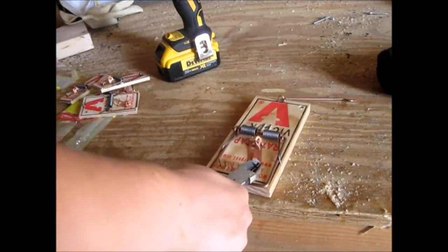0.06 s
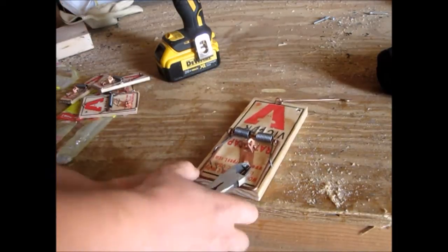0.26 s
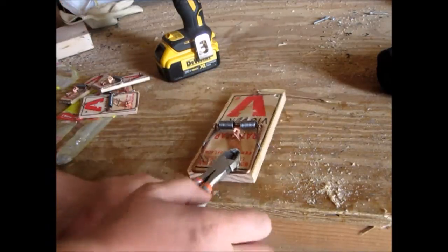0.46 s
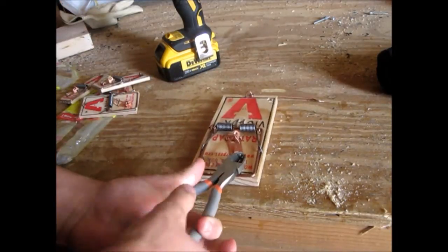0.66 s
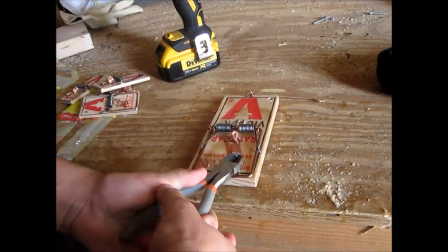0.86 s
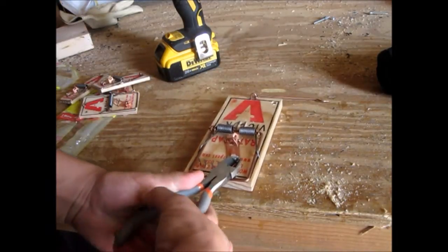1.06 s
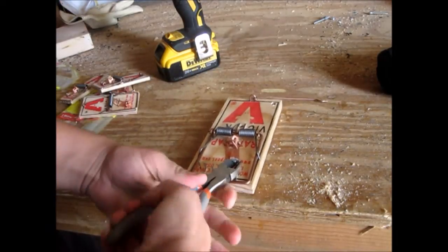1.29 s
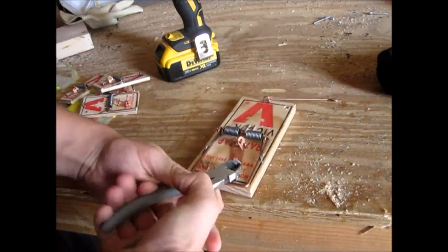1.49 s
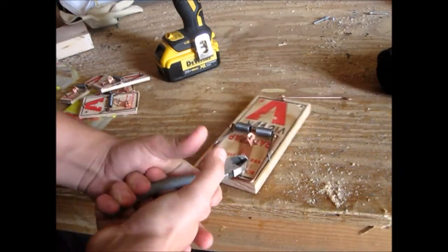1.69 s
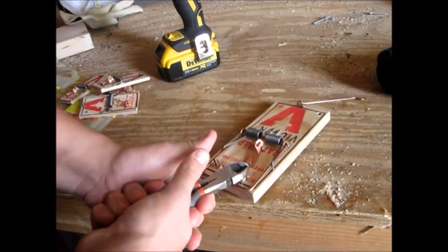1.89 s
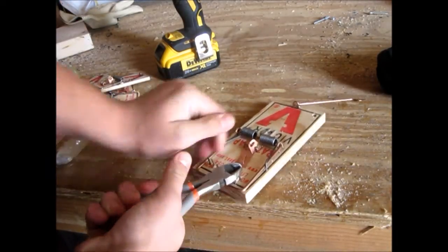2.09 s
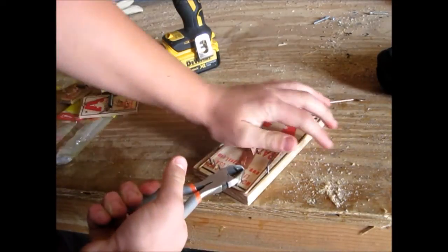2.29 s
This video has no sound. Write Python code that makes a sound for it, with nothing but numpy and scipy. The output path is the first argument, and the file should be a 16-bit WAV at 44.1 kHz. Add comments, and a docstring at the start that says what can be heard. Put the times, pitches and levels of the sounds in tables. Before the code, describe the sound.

A wooden rat trap knocks and scrapes on a workbench in uneven clusters. Hands rub on plier grips midway, then steel jaws click and the spring shivers among more knocks. A small workshop, with light microphone hiss.

```python
"""A wooden rat trap knocks and drags on a workbench while pliers work at its wire.
Each knock makes the board clack and rock and the bench top ring; dragging makes it judder and grind.
The spring shivers, the steel jaws tick and squeak on the wire, and hands rub on the grips.
The small workshop rings briefly; a small camera adds hiss and a thin whine."""
import sys
import numpy as np
from scipy import signal
from scipy.fft import rfft, irfft
from scipy.io import wavfile

SR = 44100
rng = np.random.default_rng(int(sys.argv[2]) if len(sys.argv) > 2 else 0)


def master_out(mix):
    """Clip the mix to full scale and print it as 16-bit PCM to the path in sys.argv[1]."""
    frames = np.transpose(np.atleast_2d(mix))
    ceiling = np.clip(frames, -1, 1)
    pcm = np.round(ceiling * 32767).astype(np.int16)
    wavfile.write(sys.argv[1], SR, pcm)


N = 108045
T = np.arange(N) / SR
RING = T[:SR // 3]  # time in seconds for one short sound

# The tones the bench top rings with. Each row: pitch in Hz, level in dB, seconds to fade by 60 dB.
BENCH_TONES = [(164, -41, .13), (198, 2.5, 0.066), (283, -34.5, 0.02), (280.4, 9, 0.077), (339, 2, 0.054),
               (398.6, -14, 0.12), (442, -3.5, 0.14)]


def undb(db):
    """Turn decibels into a factor to multiply by."""
    return 10 ** (np.asarray(db) / 20)


def unit(x):
    """Scale a sound so that its average level (rms) is 1."""
    return x / np.sqrt(np.mean(x ** 2) + 1e-20)


def blow(x, blow_s=0.0096):
    """Give a short sound the same energy as a level of 1 held for blow_s seconds."""
    return x / np.sqrt(np.sum(x ** 2) / (blow_s * SR) + 1e-20)


def fade(t60):
    """A curve that falls by 60 dB every t60 seconds."""
    return np.exp(-np.log(1000) * RING / t60)


def swell(middle, length):
    """A smooth rise and fall that stays above half height for length seconds."""
    return np.cos(np.pi / 2 * np.clip((T - middle) / length, -1, 1)) ** 2


def cut(x, hz, keep="low", order=2):
    """Keep the low or the high side of hz; a higher order cuts more steeply."""
    return signal.sosfilt(signal.butter(order, min(hz, SR / 2 - 1), keep, fs=SR, output="sos"), x)


def colour(x, points):
    """Make frequencies louder or softer along a curve of (Hz, dB) points."""
    hz, db = np.array(points).T
    size = 8192
    log_hz = np.log(np.maximum(np.arange(size // 2 + 1) * SR / size, 1))
    gain = undb(np.interp(log_hz, np.log(hz), db))
    # Fold the filter in time so that it never rings ahead of the sound.
    cepstrum = irfft(np.log(gain))
    cepstrum[1:size // 2] *= 2
    cepstrum[size // 2 + 1:] = 0
    response = irfft(np.exp(rfft(cepstrum)))[:size // 2]
    return signal.fftconvolve(x, response)[:len(x)]


def ring(tones, scatter_db=1.2):
    """The fading tones of a struck object; their balance shifts a little from blow to blow."""
    return -sum(undb(db + scatter_db * rng.standard_normal()) * fade(t60) * np.sin(2 * np.pi * hz * RING)
                for hz, db, t60 in tones)


def burst(t60):
    """Noise that dies away."""
    return rng.standard_normal(len(RING)) * fade(t60)


def grains(per_second, spread_db=2.5):
    """Tiny contacts of uneven size at random times."""
    hits = rng.random(N) < per_second / SR
    sizes = undb(spread_db * rng.standard_normal(N))
    return hits * sizes * np.sign(rng.standard_normal(N))


def add(out, start, x):
    """Mix a sound in at start seconds."""
    i = int(start * SR)
    out[i:i + len(x)] += x[:N - i]


def trap_knocks():
    """The trap's board clacks, rocks for a few cycles and sets the bench top ringing."""
    # Each row: start in seconds, thump level in dB, rocking pitch in Hz (set by where the board is
    # held), clack level in dB, treble limit in Hz (higher for a harder contact).
    knocks = [(0.027, -34.5, 315, -45, 900), (0.2452, -23, 296, -30.5, 1650), (.268, -31, 350, -40.5, 1190),
              (0.2892, -26, 280, -47, 2000), (0.389, -25.5, 268, -43, 2800), (0.427, -28, 292, -49, 2660),
              (0.442, -27.5, 298, -62, 2800), (.506, -27.5, 300, -55, 1980), (0.5214, -17, 270, -15, 2780),
              (0.5292, -26, 417, -33, 1110), (0.5503, -22, 240, -30, 1660), (0.584, -30, 170, -38, 1500),
              (.677, -33.5, 293, -58, 1500), (.976, -29, 242, -44.5, 2500), (1.202, -25.5, 290, -40, 1500),
              (1.218, -28, 303, -62, 1500), (1.284, -32, 212, -40, 1030), (1.5098, -15, 325, -21, 2160),
              (1.523, -26.5, 363, -43, 1137), (1.671, -31.5, 292, -52, 2500),
              (1.718, -26.5, 327, -58, 2500), (1.746, -26, 345, -63, 2500),
              (1.9297, -31.5, 355, -40.5, 4030), (1.981, -32.5, 274, -59, 1510),
              (2.007, -27, 335, -43, 2220), (2.017, -27.5, 312, -55, 1500), (2.067, -22.5, 440, -33, 3500),
              (2.072, -27.5, 458, -37, 2200), (2.089, -28.5, 190, -44, 2000), (2.101, -38, 289, -57, 2500),
              (2.1479, -20, 323, -31.5, 3480), (2.3671, -28.5, 280, -38.5, 1800)]
    # The board's tones. Each row: pitch in Hz, level in dB, seconds to fade by 60 dB.
    wood_tones = [(575, -2, 0.098), (683.4, -5, 0.097), (863, 11, 0.016), (1212, 9.5, 0.0077),
                  (1444, -9.5, 0.04), (1750, 8, 0.0087), (2014, 10, .015), (2360, -3, .014),
                  (3400, -10, 0.023)]
    rock_rise_s, bench_db, splinter_db = 0.00068, -10.5, -4
    out = np.zeros(N)
    for start, thump_db, rock_hz, clack_db, treble_hz in knocks:
        rise = 1 - np.exp(-RING / rock_rise_s)
        rock = -np.sin(2 * np.pi * rock_hz * RING) * fade(t60=0.033) * rise
        bench = signal.fftconvolve(rock, ring(BENCH_TONES))[:len(RING)]
        thump = blow(blow(rock) + undb(bench_db) * blow(bench))
        wood = blow(ring(wood_tones)) + undb(splinter_db) * blow(burst(t60=0.035))
        clack = blow(cut(cut(wood, treble_hz, order=3), 464, "high"))
        add(out, start, undb(thump_db) * thump + undb(clack_db) * clack)
    return out


def trap_drags():
    """The board sticks and slips, shaking the bench, while sawdust grinds under it."""
    # Each row: middle in seconds, length in seconds, judder level in dB, grit level in dB.
    drags = [(.14, 0.11, -44, -56), (0.276, 0.055, -31, -48), (0.437, 0.11, -38.5, -43),
             (0.562, 0.081, -28.5, -41.5), (1.215, .06, -48, -48), (1.409, 0.13, -44, -45),
             (1.713, 0.16, -41, -44), (1.737, 0.03, -33, -41), (1.898, 0.095, -40.5, -46.5),
             (2.005, 0.11, -37, -45.5), (2.092, .04, -37, -42.5), (2.173, 0.055, -39, -50),
             (2.43, 0.075, -55, -69)]
    # The tone colour of grinding sawdust. Each row: frequency in Hz, level in dB.
    grit_colour = [(300, -3), (1000, -6), (1900, 1), (2900, -7), (4100, -9), (5000, -17), (5900, -3),
                   (6800, -19.5), (9000, -11), (11000, -26), (16000, -25)]
    shaking = signal.fftconvolve(grains(per_second=260), ring(BENCH_TONES))[:N]
    judder = unit(cut(cut(shaking, 890), 260, "high"))
    grit = unit(colour(grains(per_second=1500), grit_colour))
    return sum(swell(middle, length) * (undb(judder_db) * judder + undb(grit_db) * grit)
               for middle, length, judder_db, grit_db in drags)


def spring_shivers():
    """The spring's coils chatter against each other."""
    # Each row: start in seconds, level in dB.
    shivers = [(0.261, -49), (0.309, -49), (.456, -45.5), (.572, -43.5), (0.578, -39.5), (1.206, -49),
               (1.216, -44.5), (1.281, -47.5), (1.49, -41.5), (1.55, -43.5), (1.713, -43), (1.739, -54),
               (1.753, -42), (1.872, -40), (2.037, -31.5), (2.09, -38), (2.162, -47)]
    # The spring's tones. Each row: pitch in Hz, level in dB, seconds to fade by 60 dB.
    spring_tones = [(5750, -7, 0.026), (5816, 2, 0.033), (8400, -3.5, 0.011), (9130, -2, .012),
                    (10400, -14, 0.007)]
    out = np.zeros(N)
    for start, db in shivers:
        coils = signal.fftconvolve(burst(t60=0.02), ring(spring_tones))
        add(out, start, undb(db) * blow(cut(coils, 5100, "high")))
    return out


def jaw_ticks():
    """The steel jaws slip on the wire: a short chatter and a ring that soon dies."""
    # Each row: start in seconds, level in dB, centre of the ring in Hz.
    ticks = [(0.557, -42, 3200), (0.9798, -42, 3560), (1.0734, -42, 2240), (1.8688, -40, 4100),
             (1.9296, -21.5, 4100), (2.035, -32, 5400), (2.066, -37, 2300), (2.0813, -36, 3650),
             (2.154, -41, 2800)]
    # The steel's tones. Each row: pitch in Hz, level in dB, seconds to fade by 60 dB.
    steel_tones = [(1230, -14, 0.0084), (1800, -3, 0.039), (2365, 3.5, 0.014), (3320, 0, 0.0078),
                   (3940, -1, 0.01), (4340, -5.5, 0.024), (4500, -3.5, 0.013), (5500, 6, 0.0087),
                   (7430, -12, 0.0097), (8800, -26, 0.022), (10400, -1, 0.0055)]
    chatter_db, db_per_octave = -3.5, 8.5
    out = np.zeros(N)
    for start, tick_db, centre_hz in ticks:
        chatter = blow(cut(burst(t60=0.023), 0.47 * centre_hz, order=1))
        # The place of contact favours the tones near the centre.
        tones = [(hz, db - db_per_octave * abs(np.log2(hz / centre_hz)), t60)
                 for hz, db, t60 in steel_tones]
        steel = blow(ring(tones)) + undb(chatter_db) * chatter
        add(out, start, undb(tick_db) * blow(cut(steel, 1260, "high")))
    return out


def wire_squeaks():
    """The wire squeaks briefly in the jaws, one high tone each time."""
    # Each row: middle in seconds, length in seconds, pitch in Hz, level in dB.
    squeaks = [(0.981, 0.004, 3947, -33), (2.11, 0.0093, 4440, -41.5)]
    return sum(undb(db) * swell(middle, length) * np.sin(2 * np.pi * hz * T)
               for middle, length, hz, db in squeaks)


def hands():
    """Skin rubs over the soft grips and now and then lets go with a dull snap."""
    # How loud the rubbing is. Each row: time in seconds, level in dB.
    rub_levels = [(1.11, -77), (1.16, -58), (1.22, -40), (1.27, -37.5), (1.35, -42.5), (1.42, -40.5),
                  (1.49, -43.5), (1.6, -46), (1.7, -70), (1.83, -69), (1.88, -49), (1.95, -47), (2.05, -67)]
    # The tone colour of skin on the grips. Each row: frequency in Hz, level in dB.
    grip_colour = [(100, -12), (250, 1), (430, 6), (600, -1), (820, -1), (1050, -6), (1400, -29),
                   (3000, -17), (8000, -53)]
    # The snaps. Each row: start in seconds, level in dB.
    slips = [(1.135, -37.5), (1.1565, -31.5), (1.3349, -29)]
    times, rub_db = np.array(rub_levels).T
    rubbing = unit(colour(grains(per_second=1600), grip_colour))
    out = rubbing * undb(np.interp(T, times, rub_db))
    for start, slip_db in slips:
        snap = cut(colour(burst(t60=0.018), grip_colour), 1130, order=4)
        add(out, start, undb(slip_db) * blow(snap))
    return out


def workshop(x):
    """The small room adds many quick echoes; their treble dies first."""
    # The tone colour of the echoes. Each row: frequency in Hz, level in dB.
    room_colour = [(80, -39.5), (200, 0), (400, 1), (750, 7), (1300, 3), (2200, 0.5), (4500, -2.5),
                   (12000, 3.5)]
    echo_db, delay_s = -7, 0.0037
    tail = cut(burst(t60=0.26), 1380) + cut(burst(t60=0.17), 2250, "high")
    fade_in = np.clip(RING / delay_s - 1, 0, 1)
    tail = colour(tail * fade_in, room_colour)
    tail /= np.sqrt(np.sum(tail ** 2))
    return x + undb(echo_db) * signal.fftconvolve(x, tail)[:N]


def room_air(level_db=-44.5):
    """Steady room air and hiss behind everything."""
    # The tone colour of this noise. Each row: frequency in Hz, level in dB.
    air_colour = [(25, -9.5), (45, -8.5), (72, -4), (100, -4), (150, -2.5), (280, -7.5), (430, -8.5),
                  (1000, -14.5), (2100, -17), (4200, -25), (5800, -27.5), (7000, -28.5), (8800, -24.5),
                  (11000, -25.5), (15800, -29.5)]
    return undb(level_db) * unit(colour(rng.standard_normal(N), air_colour))


def scene():
    """All the work on the trap, its deep bass cut, heard in the room."""
    handling = trap_knocks() + jaw_ticks() + spring_shivers() + wire_squeaks() + trap_drags() + hands()
    return (workshop(cut(handling, 138, "high")) + room_air())[None]


def record(dry):
    """The camera's microphone dulls the treble, its electronics add tones, and the very top is cut."""
    # How the microphone colours the sound. Each row: frequency in Hz, gain in dB.
    microphone = [(30, -1), (3000, -1.5), (4600, 0), (5000, -3), (5400, -4.5), (5950, -6.5), (6300, -21),
                  (6700, -8), (7500, -9), (16000, -10)]
    # Mains hum and the camera's electrical whine. Each row: pitch in Hz, level in dB.
    hum_and_whine = [(75, -59), (7852, -77), (7882, -75), (12601, -64)]
    tones = sum(undb(db) * np.sqrt(2) * np.sin(2 * np.pi * hz * T) for hz, db in hum_and_whine)
    top_cut = signal.ellip(10, .2, 70, 15950, fs=SR, output="sos")
    return signal.sosfilt(top_cut, colour(dry[0], microphone) + tones)[None]


dry = scene()
out = record(dry)
master_out(out)
```